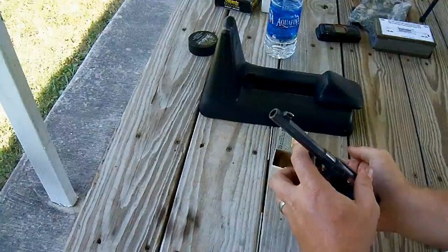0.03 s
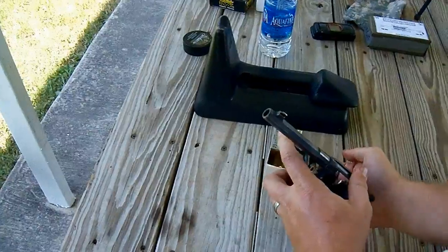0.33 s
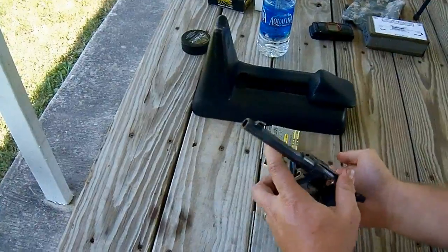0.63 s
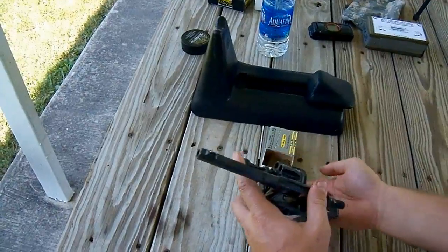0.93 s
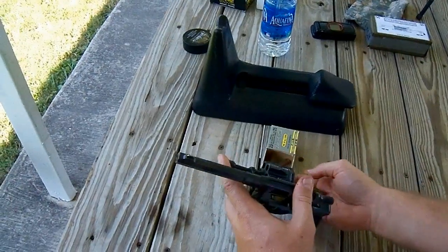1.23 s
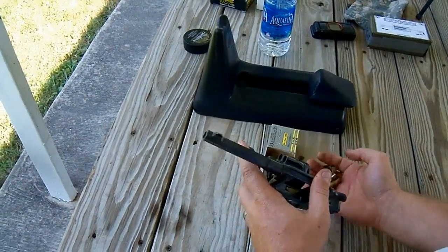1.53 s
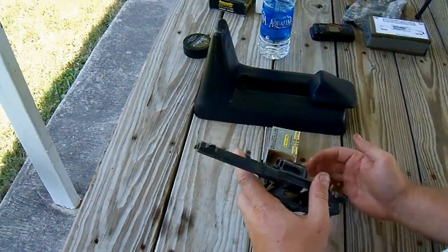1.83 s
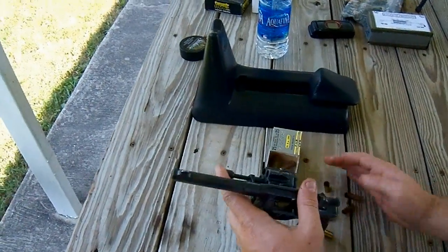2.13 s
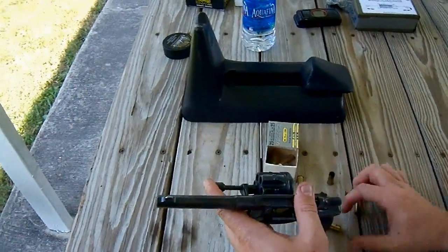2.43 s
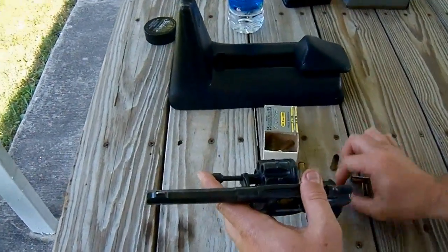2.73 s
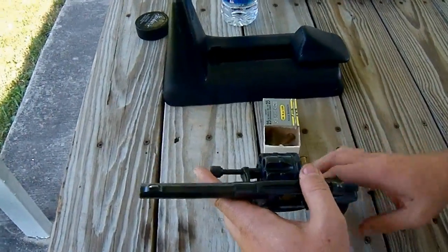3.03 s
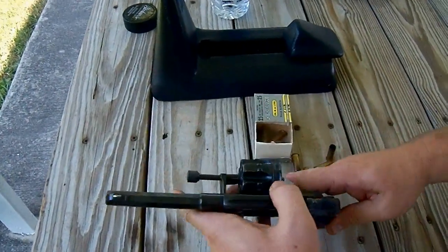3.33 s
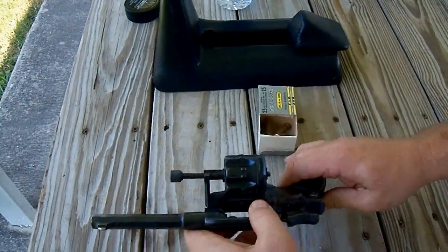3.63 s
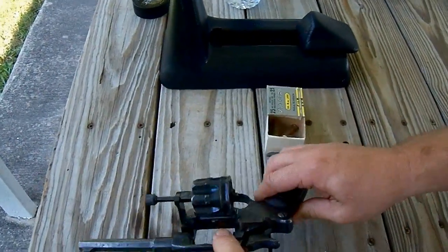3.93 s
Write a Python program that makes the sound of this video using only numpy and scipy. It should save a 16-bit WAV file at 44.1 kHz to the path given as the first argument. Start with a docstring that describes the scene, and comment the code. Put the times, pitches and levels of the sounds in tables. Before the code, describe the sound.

Empty cartridge cases clatter onto a plank table after some light jingling and clicking from a nearby revolver. More small metal clicks come, and the cases slide briefly over the wood, with insects and a distant engine faint behind.

```python
"""Spent brass cases chink and rub in an opened revolver, each ringing on a high mode of its mouth.
Steel parts click. The cases drop onto a plank table, exciting its modes, bounce and clink together;
a hand bumps the table and pushes them over the wood with a frictional scrape.
All the while, outdoors, insects trill, a cicada's hiss fades and a distant engine hums."""
import sys
import numpy as np
from scipy import signal
from scipy.fft import rfft, irfft, next_fast_len
from scipy.io import wavfile
from scipy.ndimage import map_coordinates

SR = 44100
rng = np.random.default_rng(int(sys.argv[2]) if len(sys.argv) > 2 else 0)


def to_wav(s):
    """Save 16-bit WAV."""
    ch = np.atleast_2d(s).T  # columns
    pcm = np.round(np.clip(ch, -1, 1) * 32767)  # PCM
    wavfile.write(sys.argv[1], SR, pcm.astype(np.int16))


N = 176400
HIT_T = np.arange(SR // 2) / SR  # time since an impact, t/s


def amp(db):
    """Amplitude ratio of a level in decibels."""
    return 10 ** (np.asarray(db) / 20)


def unit(x):
    """Normalisation to rms 1."""
    return x / np.sqrt(np.mean(x ** 2) + 1e-20)


def along(points, hz):
    """Interpolation of (f/Hz, value) points on a logarithmic frequency axis."""
    f, value = np.transpose(points)
    return np.interp(np.log(hz + 1), np.log(f + 1), value)


def curve(points):
    """Linear interpolation of (t/s, value) points at every sample."""
    return np.interp(np.arange(N) / SR, *np.transpose(points))


def wobble(rate):
    """Smooth random modulation: a spline through `rate` knots a second."""
    return map_coordinates(rng.standard_normal(N // 8), [np.arange(N) * rate / SR], mode="wrap")


def fade(t, t60):
    """Exponential decay, by 60 dB in t60 seconds."""
    return np.exp(-np.log(1000) * t / t60)


def noise(tone, size=N, peaks=(), peak_db=9, half_width_hz=14):
    """Spectral shaping: coloured noise of rms 1, with a Lorentzian resonance at each peak."""
    hz = np.fft.rfftfreq(size, 1 / SR)
    power = 1 + sum(amp(peak_db) ** 2 / (1 + ((hz - peak) / half_width_hz) ** 2) for peak in peaks)
    white = rfft(rng.standard_normal(size))
    return unit(irfft(white * amp(along(tone, hz)) * np.sqrt(power), size))


def impulse(tone):
    """Minimum-phase impulse response: a causal click of the given spectrum, peak 1."""
    size = len(HIT_T)
    cepstrum = irfft(np.log(amp(along(tone, np.fft.rfftfreq(size, 1 / SR)))), size)
    cepstrum[1:size // 2] *= 2
    cepstrum[size // 2:] = 0
    click = irfft(np.exp(rfft(cepstrum)), size)
    return click / np.abs(click).max()


def tail(tone, t60s, peaks):
    """Modal overlap: dense modes merge into noise, each band decaying at its own rate."""
    hz, t, bands = signal.stft(noise(tone, len(HIT_T), peaks), SR, nperseg=128)
    bands = bands * fade(t, along(t60s, hz)[:, None])
    return signal.istft(bands, SR, nperseg=128)[1][:len(HIT_T)]


def ring(modes, scatter_db):
    """Modal superposition: damped sinusoids, scattered in level and sign at every blow."""
    draws = rng.standard_normal((len(modes), 2))
    return sum(amp(db + scatter_db * spread) * np.sign(side)
               * np.sin(2 * np.pi * hz * HIT_T) * fade(HIT_T, t60)
               for (hz, db, t60), (spread, side) in zip(modes, draws))


# chinks of the cases: t/s, f/Hz, level/dB, time until touched/s
CASE_CHINKS = [(.001, 6660, -32.5, 0.047), (0.06, 6700, -31.5, 0.033), (0.172, 6630, -38, .006),
               (.194, 6760, -31.5, 0.037), (1.362, 6750, -44, .03), (1.574, 6710, -47, .045),
               (1.621, 6694, -43, 0.044), (1.7595, 6653, -30.5, 0.023), (1.863, 6637, -38, .008),
               (1.87, 6780, -30.5, 0.0033), (1.8961, 6660, -23.5, 0.0076), (1.968, 6739, -38.5, .05),
               (2.0243, 6760, -36.5, 0.0087), (2.064, 6750, -38, 0.019), (2.3283, 6750, -38.5, 0.029),
               (2.892, 6710, -36.5, .085)]


def case_chinks():
    """Mode splitting: a slightly oval mouth rings at two close pitches until contact damps it."""
    free_t60, contact_t60 = 0.26, 0.059  # s
    out = np.zeros(N)
    for s, hz, db, free_s in CASE_CHINKS:
        pair = [(hz, 0, free_t60), (hz + 32, -20, free_t60)]
        overtone = (rng.normal(13100, 150), -27, free_t60 / 2)
        damping = fade(np.maximum(HIT_T - free_s, 0), contact_t60)
        add(out, s, amp(db) * ring(pair + [overtone], scatter_db=0.46) * damping)
    return out


# rubbing in the chambers: t/s, level/dB
RUB_LEVEL = [(0, -49), (.2, -56.5), (.33, -53), (.45, -62), (.7, -100)]
# its spectrum: f/Hz, relative level/dB
RUB_TONE = [(300, -14), (750, 2), (1100, -8.5), (1650, -4), (2200, -7), (2900, 5), (4500, -20), (6350, 0),
            (6680, 15), (7050, -7), (9000, -4.5), (14000, -13)]


def chamber_rub():
    """Friction noise: loose cases rub and jingle faintly as the gun is turned."""
    return amp(curve(RUB_LEVEL) + 3.3 * wobble(121)) * noise(RUB_TONE)


# the cicada's contour before its fade: t/s, relative level/dB
CICADA_LEVEL = [(0.0, -47.5), (0.67, -51), (1.94, -53.5), (2.17, -65), (2.42, -54), (2.88, -69), (3.2, -61),
                (4.0, -65)]
# its spectrum: f/Hz, relative level/dB
HISS_TONE = [(1500, -44), (2400, -18), (3300, -4.5), (4500, -2), (5700, 0.5), (6800, 0.5), (7700, -5.5),
             (9000, -19), (14000, -25.5)]


def cicada(gain_db=2, end_s=2.51, fade_s=0.76):
    """Amplitude-modulated noise: a cicada's hiss flutters and dies away."""
    singing = np.clip((end_s - np.arange(N) / SR) / fade_s, 0, 1)
    return singing * amp(curve(CICADA_LEVEL) + gain_db + 1.3 * wobble(60.1)) * noise(HISS_TONE)


# far insects: f/Hz, relative level/dB
CHORUS_TONE = [(5500, -15), (6400, -15), (6800, -5), (7500, -8.5), (7950, 4.5), (8300, -25), (8700, -43),
               (10000, -18)]


def insect_chorus():
    """Incoherent summation: many far insects blend into a steady band of noise."""
    return amp(-58) * noise(CHORUS_TONE)


# near insects: syllable rate/Hz, syllable start f/Hz, end f/Hz, opening level/dB, closing level/dB
INSECT_TRILLS = [(26.9, 8000, 7900, -58, -61), (30.15, 8300, 8100, -63, -62)]


def insect_trills(wander_hz=34.7, flicker_db=1.6):
    """Amplitude and frequency modulation: two insects repeat raspy syllables of falling pitch."""
    out = np.zeros(N)
    for rate, start_hz, end_hz, first_db, last_db in INSECT_TRILLS:
        syllable = np.cumsum(rate + 0.1 * wobble(3.22)) / SR % 1
        hz = start_hz + (end_hz - start_hz) * syllable + wander_hz * wobble(40)
        phase = 2 * np.pi * np.cumsum(hz) / SR
        rasp = 0.53 * (wobble(170) + 1j * wobble(170))  # broadens the spectral line
        pulse = np.abs(np.sin(np.pi * syllable)) ** 1.2
        song = np.real((1 + rasp) * np.exp(1j * phase)) * pulse
        out += amp(np.linspace(first_db, last_db, N)) * unit(song * amp(flicker_db * wobble(20)))
    return out


# the engine's partials: f/Hz, level/dB
ENGINE_PARTIALS = [(32.5, -60.5), (64.6, -58), (72.2, -57), (134, -64), (172.3, -62.5), (419.9, -68.5)]


def far_engine(drift_hz=1.245, waver_db=1):
    """Beating: a far engine hums in drifting low partials, the closest of which interfere."""
    out = np.zeros(N)
    for hz, db in ENGINE_PARTIALS:
        gain = amp(db + waver_db * wobble(5.15))
        phase = 2 * np.pi * np.cumsum(hz + drift_hz * wobble(3.97)) / SR
        out += gain * unit(np.sin(phase))
    return out


# outdoor air: f/Hz, relative level/dB
AIR_TONE = [(12, -26), (20, -10.5), (75, -2.5), (101, -9), (174, -10), (206, -11.5), (302, -13),
            (386, -15.5), (419, -16.5), (551, -18.5), (809, -21), (1610, -26.5), (5670, -34.5),
            (8090, -30.5), (14000, -50.5)]


def outdoor_air():
    """Ambient noise: broadband, nearly steady and strongest at low frequencies."""
    return amp(-51.5 + 0.17 * wobble(5.32)) * noise(AIR_TONE)


# metal contacts: t/s, relative tick level/dB, relative clack level/dB, clack f/Hz
STEEL_CONTACTS = [(.022, -38, -43, 1650), (0.0501, -50, -38.5, 1670), (.063, -38, -44, 1680),
                  (.080, -40, -41.5, 1740), (0.1728, -20.5, -30, 3270), (.178, -22, -39, 3330),
                  (0.2344, -37, -40, 3280), (0.3, -50, -37, 9500), (0.348, -44, -32, 9400),
                  (.359, -50, -40, 9000), (1.352, -39, -54, 3400), (1.502, -35, -52, 3380),
                  (1.7633, -44, -26, 3620), (1.8231, -20, -29, 3470), (1.8645, -22.5, -41, 3400),
                  (1.873, -26, -36, 3500), (1.8956, -39, -37, 5250), (1.9178, -40, -31, 3470),
                  (1.9305, -30, -41, 3520), (1.934, -25, -37, 3420), (2.032, -28, -38, 4170),
                  (2.086, -39, -33, 4180), (2.0923, -36, -52, 4000), (2.329, -36, -43, 3500),
                  (2.366, -53, -50, 3520), (2.653, -56, -48.5, 3400), (2.8906, -38, -38, 3480),
                  (3.0611, -32, -40, 5650), (3.065, -36, -32, 3540), (3.066, -50, -35, 5660),
                  (3.111, -36.5, -42, 3440), (3.1744, -33, -40, 4900), (3.1816, -45, -24, 4070),
                  (3.1819, -51, -26.5, 3310), (3.183, -52, -34, 2085)]
# the tick's spectrum: f/Hz, relative level/dB
TICK_TONE = [(1500, -18), (4000, -5), (7000, -1.5), (10000, -3), (13000, 3.5), (15000, -11)]
# the clack's spectrum: ratio to its pitch, relative level/dB
CLACK_SHAPE = [(.3, -32), (.6, -14), (.8, -6), (1.0, 9), (1.15, -5.5), (1.4, -15), (3, -27.5)]


def steel_clicks():
    """Hard impact: a bright tick and a pitched clack snap, chatter and are damped by the hand."""
    out = np.zeros(N)
    chatter = amp(-10.5) * fade(HIT_T, t60=0.0053)
    decay = chatter + amp(-20) * fade(HIT_T, t60=0.03)
    for s, tick_db, clack_db, hz in STEEL_CONTACTS:
        clack_tone = [(hz * ratio, db) for ratio, db in CLACK_SHAPE]
        for tone, db, snap_db in ((TICK_TONE, tick_db, -8), (clack_tone, clack_db, -1.5)):
            snap = amp(snap_db) * impulse(tone)
            add(out, s, amp(db) * (snap + decay * noise(tone, len(HIT_T))))
        ringing = np.sin(2 * np.pi * hz * HIT_T) * fade(HIT_T, t60=0.048)
        add(out, s, amp(clack_db - 23.5) * ringing)
    return out


# cases striking the table: t/s, blow level/dB, relative ring level/dB, tilt/(dB per octave)
CASE_DROPS = [(.236, -39, -55, -9), (.732, -43.5, -43, -4), (1.529, -31, -27, -7), (1.5698, -19.5, -20, -1),
              (1.6195, -31, -30, -2), (1.7595, -22.5, -19.5, 2), (1.7635, -18, -21, 0.5),
              (1.829, -26.5, -21.5, -1.5), (1.8735, -24, -28, -2.5), (1.8815, -20, -20, -2),
              (1.8958, -17, -22.5, 9.5), (1.917, -26, -24.5, -4), (1.928, -23, -45, 3),
              (1.968, -18.5, -18, -2.5), (1.995, -27, -43, -2), (2.0185, -34, -27, 1),
              (2.0315, -11.5, -14.5, 1.5), (2.0375, -19, -32, 1.5), (2.041, -28, -30, 7),
              (2.0915, -20, -20.5, 0.5), (2.1065, -26, -25.5, 0), (2.1365, -40, -25, -5.5),
              (2.2125, -23.5, -28.5, 1.5), (2.2275, -28.5, -29, -7.5), (2.258, -35, -33, -3),
              (2.8868, -25.5, -23.5, -1.5), (2.948, -44, -35.5, -3)]
# plank modes: f/Hz, relative level/dB, T60/s
PLANK_MODES = [(486, -5.5, 0.12), (633, -6.5, .12), (710.4, -4.5, 0.25), (856, -13, 0.062), (934, -12, .08),
               (1008, -4, 0.087), (1075, -2, 0.14), (1200, -5, 0.14), (1355, -1.5, 0.19),
               (1482, 2.5, 0.093), (1556, -14, 0.098), (1675, -2.5, 0.11), (1890, -2.5, 0.16),
               (2118, -13, 0.12), (2140, 3, 0.1), (2288, -4.5, 0.11), (2996, -6, 0.11), (3480, -9, .06),
               (4010, -9.5, 0.099)]
# spectra, before the tilt, of a board's first flex and of the dense ring: f/Hz, relative level/dB
FLEX_TONE = [(200, -29), (600, -16), (1100, -17), (1500, 3.5), (1950, 3), (2700, -10.5), (3500, -9),
             (5800, -18), (8000, -23.5), (14000, -28)]
WOOD_TONE = [(150, -26), (450, -7), (800, -2.5), (1200, 1.5), (2100, -1.5), (2600, 0), (4000, -3.5),
             (6000, -3), (9000, -16), (14000, -26)]
# decay of the dense ring in table and porch: f/Hz, T60/s
TABLE_DECAY = [(300, .1), (1500, 0.079), (4000, 0.061), (12000, 0.037)]
PORCH_DECAY = [(300, 0.35), (1800, 0.31), (5000, 0.2), (12000, 0.078)]
WOOD_RISE = 1 - np.exp(-HIT_T / 0.001)  # vibration builds with a 1 ms time constant


def table_knocks():
    """Impulse excitation: each blow flexes a board, then spreads into the planks' modes and the porch."""
    out = np.zeros(N)
    peaks = [hz for hz, _, _ in PLANK_MODES]
    for s, blow_db, ring_db, tilt in CASE_DROPS:
        flex = [(hz, db + tilt * np.log2(hz / 1800)) for hz, db in FLEX_TONE]
        wood = [(hz, db + tilt * np.log2(hz / 1800)) for hz, db in WOOD_TONE]
        body = amp(-23) * ring(PLANK_MODES, scatter_db=1.0)
        body += amp(-13.5) * tail(wood, TABLE_DECAY, peaks)
        body += amp(-23.5) * tail(wood, PORCH_DECAY, peaks)
        add(out, s, amp(blow_db) * impulse(flex) + amp(ring_db) * WOOD_RISE * body)
    return out


# the hand against the table: t/s, level/dB
HAND_BUMPS = [(1.735, -42.5), (2.2344, -35.5)]
# the table's low modes: f/Hz, relative level/dB, T60/s
THUD_MODES = [(270, -7, 0.056), (321, 1, 0.076), (421, -3, 0.064), (500, -10, .04), (902, -9, 0.075),
              (1020, -14, .05)]


def hand_bumps():
    """Soft impact: a hand excites only the table's low modes."""
    out = np.zeros(N)
    for s, db in HAND_BUMPS:
        add(out, s, amp(db) * WOOD_RISE * ring(THUD_MODES, scatter_db=2.5))
    return out


# the scrape on wood and the singing of the rubbed brass: t/s, level/dB
SCRAPE_LEVEL = [(3.15, -100), (3.24, -51.5), (3.29, -53.5), (3.36, -52), (3.42, -61.5), (3.6, -67),
                (3.8, -100)]
BRASS_LEVEL = [(3.15, -110), (3.2, -67), (3.29, -55), (3.38, -64.5), (3.47, -68), (3.62, -72), (3.8, -110)]
# their spectra: f/Hz, relative level/dB
SCRAPE_TONE = [(170, 0.5), (600, 0), (1300, -5.5), (2200, -5.5), (3200, -14), (4500, -11), (6500, -21),
               (12000, -42)]
BRASS_TONE = [(3000, -45), (3400, -17), (3560, 3), (3720, -14), (4000, -24), (4330, -8), (4800, -38)]


def case_slide():
    """Sliding friction: cases scrape unevenly over the grain and sing thinly at their resonances."""
    grain_db = 2.3 * wobble(170)
    scrape = amp(curve(SCRAPE_LEVEL) + grain_db) * noise(SCRAPE_TONE)
    singing = amp(curve(BRASS_LEVEL) + grain_db / 2) * noise(BRASS_TONE)
    return scrape + singing


def add(track, s, sound):
    """Superposition of a sound on the track, starting at time s."""
    part = track[max(round(s * SR), 0):][:len(sound)]
    part += sound[:len(part)]


def scene():
    """Linear superposition: all sources sum at one point, the same in both channels."""
    handling = table_knocks() + hand_bumps() + case_chinks() + steel_clicks()
    friction = chamber_rub() + case_slide()
    outdoors = cicada() + insect_chorus() + insect_trills() + far_engine() + outdoor_air()
    mono = handling + friction + outdoors
    return np.array([mono, mono])


def record(dry):
    """Band limiting: an ideal low-pass filter removes the highest treble."""
    cutoff_hz = 14050
    size = next_fast_len(N + SR // 2)
    passband = np.fft.rfftfreq(size, 1 / SR) < cutoff_hz
    return irfft(rfft(dry, size) * passband, size)[:, :N]


dry = scene()
out = record(dry)
to_wav(out)
```